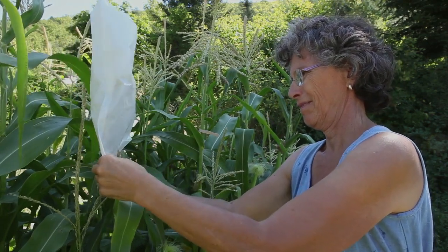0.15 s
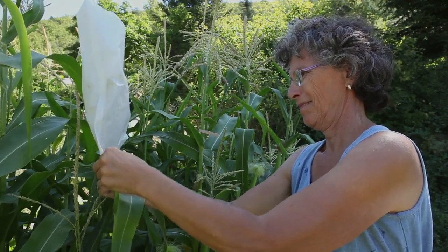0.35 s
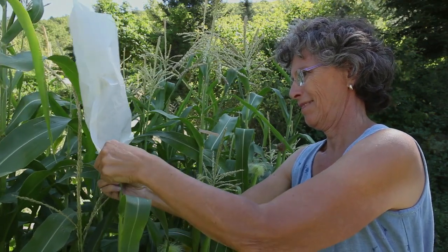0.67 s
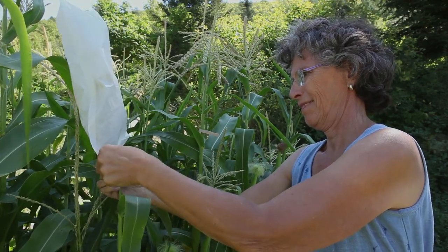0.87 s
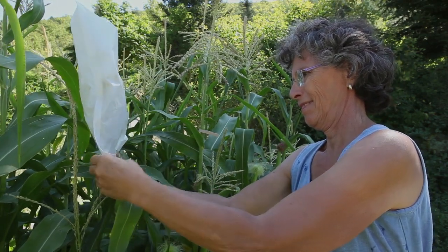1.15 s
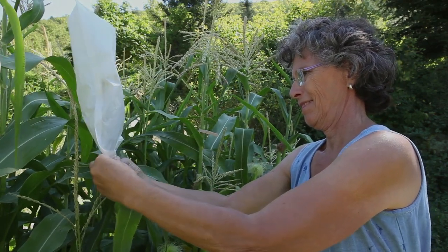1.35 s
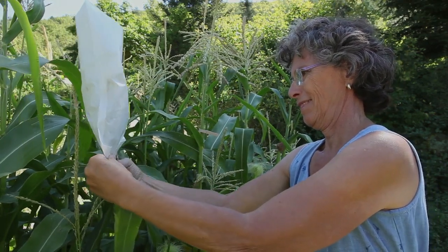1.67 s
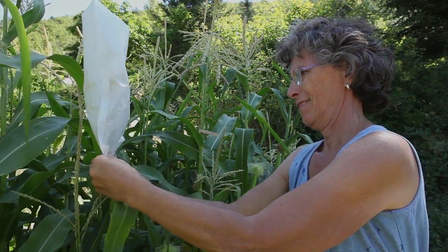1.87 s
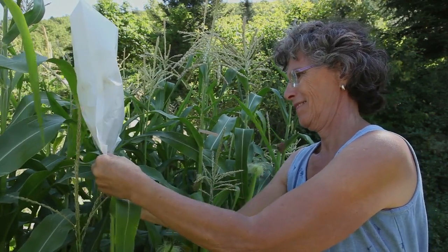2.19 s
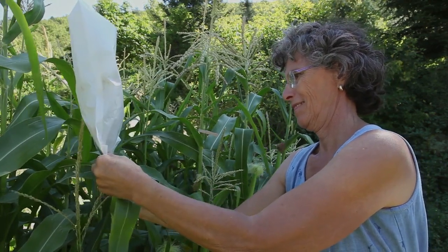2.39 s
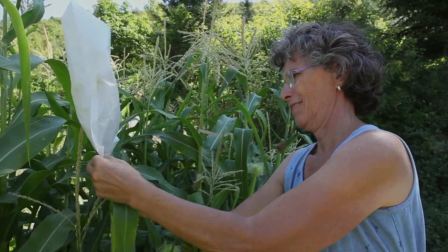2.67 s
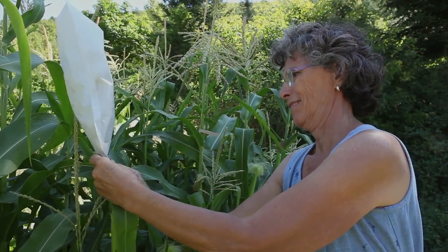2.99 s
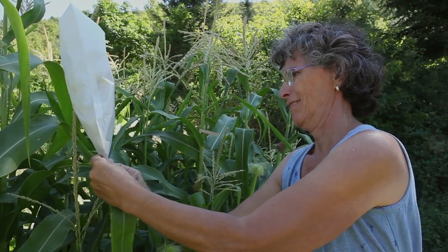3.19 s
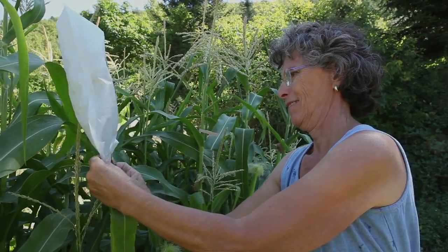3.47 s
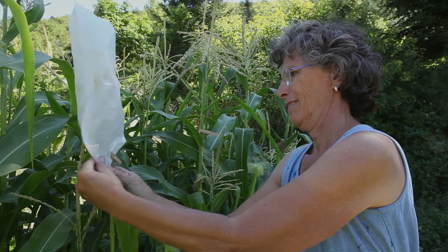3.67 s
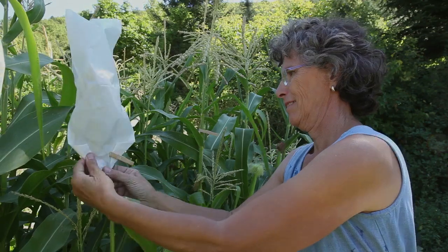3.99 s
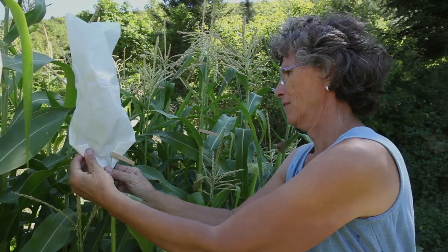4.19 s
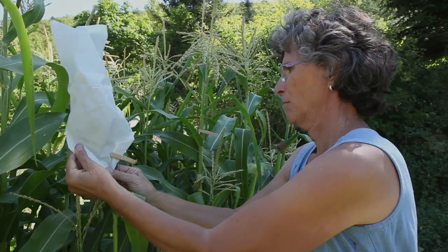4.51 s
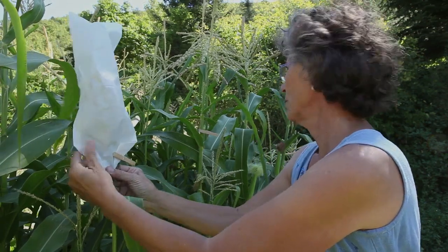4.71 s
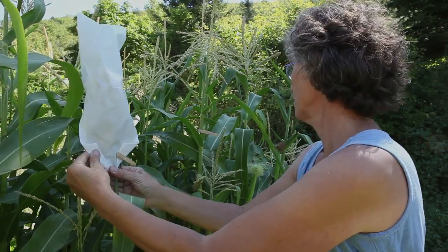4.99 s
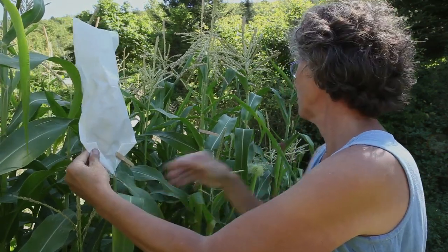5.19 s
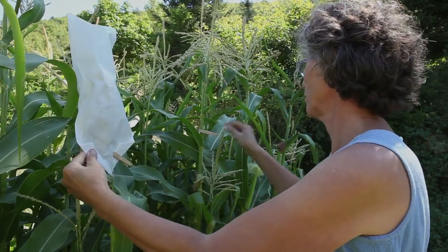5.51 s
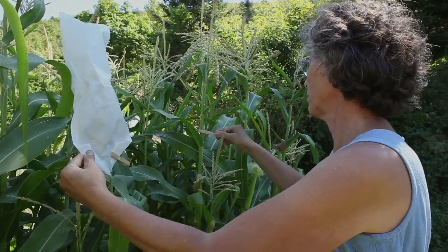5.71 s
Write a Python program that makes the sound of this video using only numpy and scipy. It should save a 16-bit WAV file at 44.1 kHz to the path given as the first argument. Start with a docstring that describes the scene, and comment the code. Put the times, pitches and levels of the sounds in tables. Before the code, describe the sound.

Close, dry paper crinkling with sharp snaps and soft rubbing outdoors, pausing briefly twice, then fading to faint air.

```python
"""A stiff paper bag, gathered around a corn stalk and pinned shut close to the microphone in a quiet garden.
Its creases snap: bursts of jerks drive the sheet in three bands, singly, in squeezes and as strays.
Hands and leaves rub the paper (noise and fine crackle), and a leaf squeaks once as a falling sine.
The hollow bag colours snaps and rubbing. Plants scatter all paper sound and the far garden edge echoes it.
Behind lie faint air noise and a far low drone."""
import sys
import numpy as np
from scipy import signal
from scipy.fft import rfft, irfft, next_fast_len
from scipy.io import wavfile
from scipy.ndimage import map_coordinates

SR = 44100
rng = np.random.default_rng(int(sys.argv[2]) if len(sys.argv) > 2 else 0)


def log_audio(samples):
    """Write samples as a 16-bit WAV file to the path given in sys.argv[1]."""
    # one column per channel
    frames = np.atleast_2d(samples).T
    # limit to full scale, then quantise
    limited = np.clip(frames, -1, 1)
    pcm = np.round(limited * 32767).astype(np.int16)
    wavfile.write(sys.argv[1], SR, pcm)


N = 257984

# single creases that stand out: start_s, sheet_db (crack of the sheet, rms over 10 ms),
# hollow_db (low pop of the bag, re sheet), crisp_db (bright click, re sheet)
SINGLE_CREASES = [(.003, -28.5, -14, -8), (.016, -40, -5.5, 2.5), (.029, -34.5, -9.5, -4),
                  (.053, -34.5, 2, -6), (.133, -41.5, -10.5, 3), (.144, -34, -3, -9), (.153, -36, -2.5, -4),
                  (.222, -37, -11, 4.5), (.286, -44, -7.5, 6.5), (.313, -35.5, 2.5, -10),
                  (.373, -31, -9, 0.5), (.442, -31, -1.5, -15), (.461, -28.5, -3, -1.5),
                  (.482, -29.5, -3, -10), (.52, -32.5, -13, 5.5), (.556, -33, -8, -6), (.576, -35, -9, 2.5),
                  (.606, -23.5, -7, -2.5), (.638, -24, -10, -4), (.664, -35, -3.5, 1.5),
                  (.702, -35.5, -25, 1), (.745, -32.5, 2, 5.5), (.755, -31, -8.5, -14),
                  (.782, -34.5, -5, -4), (.8, -37, -10, 4), (.829, -34, -12, -1.5), (.911, -45, -17, 10),
                  (1.0, -52.5, -4, 14), (1.226, -43.5, -15.5, -1), (1.238, -37, -5, -19),
                  (1.25, -38, -19.5, -5), (1.294, -36, -30, 4), (1.321, -38.5, -13.5, -10),
                  (1.374, -36, -13, -4), (1.448, -35.5, -7, -28), (1.477, -42.5, -4.5, -9),
                  (1.553, -29, -8.5, 3), (1.611, -30.5, -2.5, 3.5), (1.629, -29, -9, -0.5),
                  (1.646, -29, -1, -1), (1.69, -32.5, -18, -11), (1.705, -31.5, -9, -2.5),
                  (1.734, -35, -3, -3), (1.749, -37.5, -5, 8.5), (1.77, -30.5, 3, -2),
                  (1.78, -26, -4.5, -9), (1.808, -39, 10, -6), (1.836, -40, 6, 1),
                  (1.873, -36.5, -21.5, -4), (1.913, -38.5, -1.5, -11), (1.933, -29.5, 5, -1.5),
                  (1.963, -37.5, -12, -5), (1.975, -30, 3.5, -2), (1.993, -27, -1, -7),
                  (2.338, -44.5, 2.5, -16), (2.477, -45, -17.5, 8), (2.565, -45, -17.5, 8),
                  (2.592, -27.5, -8.5, 1.5), (2.65, -27.5, -7, -3), (2.687, -54, -8, 17.5),
                  (2.723, -40, -15, 4.5), (2.785, -38, -2, -1), (2.856, -36.5, 2.5, -13),
                  (2.892, -26.5, -11, 0), (2.957, -31, -29.5, 0), (3.016, -32, -7, 1), (3.043, -45, -5, 9),
                  (3.076, -39.5, -23, 6), (3.091, -28.5, -27, -5), (3.174, -29, -13.5, 4.5),
                  (3.186, -36, -9, 6), (3.213, -41.5, -23, 4), (3.229, -55, 12.5, -9),
                  (3.261, -44.5, -19.5, 3.5), (3.279, -40.5, -24.5, -1), (3.296, -47, -11, -1),
                  (3.313, -47.5, -23.5, 7), (3.354, -47, -2.5, -0.5), (3.427, -38, -1, -9),
                  (3.444, -39.5, 8, 0), (3.586, -36, -26.5, 2), (3.613, -36.5, -15.5, -2),
                  (3.641, -37.5, -9.5, 4.5), (3.736, -36, -19, 5), (3.775, -27, -13, -2),
                  (3.822, -34.5, -4, -12), (3.865, -38, -6, -4), (3.893, -35, -3, -1.5),
                  (3.95, -40, -18, -0.5), (3.975, -35, -30, 4), (3.996, -40.5, -15.5, 5),
                  (4.02, -27, -4.5, -4), (4.053, -31, -0.5, -3.5), (4.088, -25.5, -5, -8),
                  (4.147, -25.5, -9.5, -7), (4.155, -35, -3, 1.5), (4.187, -28, -8, -7),
                  (4.224, -25.5, -11, -2), (4.237, -24.5, -11.5, -3.5), (4.263, -25.5, -13, -1.5),
                  (4.281, -27, -9, -6), (4.389, -41, 0, 2), (4.409, -35, -10.5, -1.5),
                  (4.433, -33.5, 0, -5.5), (4.495, -53, -13, 12), (4.518, -30, -1.5, 1),
                  (4.534, -25.5, -4, -6.5), (4.613, -37, -25, 3), (4.623, -33, -13, -7),
                  (4.679, -34, -6.5, -4.5), (4.721, -48, -22.5, 14), (4.786, -25.5, -17.5, -4.5),
                  (4.803, -32.5, -30, 0), (4.823, -36.5, -18.5, 3), (4.846, -37.5, -4, -6),
                  (4.863, -33, -8, -1), (4.911, -34, -25.5, 0), (4.924, -36, -14.5, 3),
                  (4.931, -32.5, -2.5, -10), (4.957, -39, -1.5, -7), (5.032, -28, -6.5, 1),
                  (5.09, -33.5, -12.5, -4.5), (5.18, -55, -15, 8.5), (5.3, -41.5, -17, -23),
                  (5.394, -50, -14.5, -2), (5.423, -56, -18.5, 8), (5.512, -62, 12, -5)]
# squeezes that crush many creases in a row: start_s, length_s, sheet_db
CRUSHING_SQUEEZES = [(.618, .025, -31), (1.572, .035, -34.5), (1.774, .025, -32), (4.059, .06, -35.5),
                     (4.206, .09, -32), (4.534, .028, -34)]
# spectrum of a buckling crease: frequency_hz, level_db (per Hz, relative)
CREASE_SPECTRUM = [(71, -49), (120, -8), (170, -23.5), (246, -13), (385, -10), (436, -4), (557, -6.5),
                   (856, 1), (1190, -5), (2700, 0), (4590, -4), (8480, -13), (10200, -18.5), (13900, -26.5),
                   (16000, -32)]
# resonances of the air in the bag: centre_hz, width_hz, lift_db
BAG_RESONANCES = [(467, 74, -1), (760, 71, 0.5), (897, 32, 1.5)]
# hands and leaves sliding over the paper: middle_s, length_s, level_db
RUBBING_STROKES = [(.01, 0.091, -34.5), (0.156, 0.11, -42.5), (0.345, 0.31, -46.5), (0.45, 0.086, -51),
                   (.61, 0.19, -39.5), (0.783, 0.11, -42.5), (.96, 0.095, -44), (1.344, 0.16, -46),
                   (1.607, 0.084, -36), (1.77, 0.1, -45.5), (1.96, 0.14, -46), (2.155, 0.036, -46.5),
                   (2.225, 0.062, -49.5), (2.432, 0.036, -43.5), (2.62, .22, -46), (2.836, 0.19, -42.5),
                   (3.154, 0.098, -44), (3.446, 0.059, -43.5), (3.593, .13, -42.5), (3.834, 0.21, -40.5),
                   (4.066, 0.11, -40.5), (4.235, 0.075, -35), (4.435, 0.045, -50.5), (4.556, 0.15, -44.5),
                   (4.88, 0.61, -52.5), (5.064, 0.13, -49), (5.702, .17, -52)]
# spectrum of sliding paper: frequency_hz, level_db (per Hz, relative)
SLIDING_SPECTRUM = [(120, -8), (220, -14), (400, -5.5), (600, -4.5), (870, -2.5), (1200, -6), (2200, -1.5),
                    (4500, -5), (8800, -14), (11000, -20), (16000, -35)]
# a leaf slipping on the paper: time_s, pitch_hz, level_db
LEAF_SQUEAK = [(.853, 4800, -68), (.862, 4470, -55), (.872, 4280, -46), (.881, 4150, -53),
               (.885, 4100, -71)]
# decay of the scatter from the plants: frequency_hz, t60_s
PLANT_DECAY = [(200, 0.32), (2000, 0.051), (12000, 0.055)]
# spectrum of still garden air: frequency_hz, level_db (per Hz, relative)
AIR_SPECTRUM = [(15, -27), (40, -10.5), (145, -13.5), (300, -10), (600, -12.5), (2800, -18.5), (6200, -22),
                (8500, -20.5), (16000, -20)]
# far low drone: time_s, level_db (before its wavering)
DRONE_LEVEL = [(0, -69), (.9, -71.5), (1.15, -64), (1.48, -62), (1.6, -69.5), (5.1, -82.5), (5.4, -70.5),
               (5.85, -70)]

HOLLOW_HZ, CRISP_HZ = 1300, 4500  # edges between the hollow, sheet and crisp bands
# running time of a crease of typical strength and hollowness 0; that strength; longest run
RUN_S, TYPICAL_DB, LONGEST_RUN_S = .0058, -34, .0058
RUN_HOLLOW_DB, RUN_STRENGTH_DB = 10, 25.5  # rise in hollowness or in strength that doubles the run
CRUSH_GAP_S, CRUSH_SCATTER_DB = 0.0083, 1.5  # mean gap between crushed creases; spread of strength
CRUSH_HOLLOW_DB, CRUSH_CRISP_DB = -8, -4.5
STRAY_DB, STRAY_SCATTER_DB = -1.5, 1.53  # strength of stray creases, relative to the rubbing level
STRAY_HOLLOW_DB, STRAY_CRISP_DB = -9, -3.5
COLOUR_SCATTER_DB = 3  # spread of hollowness and crispness among crushed or stray creases
# faint rubbing of the held bag, until the hand leaves it
HOLD_DB, LET_GO_S, RELEASE_DB_PER_S = -56.5, 5.24, 33.5
BODY_DB, SURFACE_DB = -5.5, -1.5  # share of the rubbing in the bag's body and in its surface hiss
TOP_HZ = 15950  # upper band limit at the microphone


def snaps(creases, size=4096):
    """Every jerk clicks and shakes the sheet; hollow, strong creases run longer, up to a limit."""
    start_s, sheet_db, hollow_db, crisp_db = creases.T
    doublings = hollow_db / RUN_HOLLOW_DB + (sheet_db - TYPICAL_DB) / RUN_STRENGTH_DB
    run_s = np.minimum(RUN_S * 2 ** doublings, LONGEST_RUN_S)
    t, hz = np.arange(size) / SR, np.fft.rfftfreq(size, 1 / SR)
    lead_s = .003  # room for the warning tick
    jerks = slips(run_s, lead_s, first=2.33, warning=0.13, scatter_db=4, count=9)
    # a short crease barely stirs the sheet
    stirred = np.sqrt(np.minimum(np.abs(run_s) / 0.001, 1))[:, None]
    colour = amp(along(CREASE_SPECTRUM, hz)) * bag(hz)
    colour = colour * facets(hz, creases, depth_db=2.5) * above(hz, 243, order=3)
    # some creases break more sharply: the top treble varies from one to the next
    sharpness_db = 2.3 * rng.standard_normal((len(start_s), 1))
    colour = colour * amp(sharpness_db * above(hz, 13700))

    def band(gain, level_db, t60, ring_db):
        """The jerks plus the noisy shaking they leave, in one band at its own level."""
        decay_power = amp(-60 * t / t60) ** 2
        kernel = decay_power[None] / decay_power.sum()
        shaking_power = signal.fftconvolve(jerks ** 2, kernel, axes=1)[:, :size]
        shaking = np.sqrt(np.abs(shaking_power))
        drive = jerks + amp(ring_db) * stirred * shaking * rng.standard_normal(jerks.shape)
        wave = unit(irfft(rfft(drive) * causal(colour * gain)))
        # levels are rms over 10 ms
        return wave * amp(level_db)[:, None] * np.sqrt(.01 * SR / size)

    hollow_gain = below(hz, HOLLOW_HZ)
    sheet_gain = above(hz, HOLLOW_HZ) * below(hz, CRISP_HZ)
    crisp_gain = above(hz, CRISP_HZ)
    waves = band(hollow_gain, sheet_db + hollow_db, t60=0.032, ring_db=0.5)
    waves += band(sheet_gain, sheet_db, t60=0.028, ring_db=-5)
    waves += band(crisp_gain, sheet_db + crisp_db, t60=0.034, ring_db=-8)
    first_sample = np.maximum(np.round((start_s - lead_s) * SR).astype(int), 0)
    where = first_sample[:, None] + np.arange(size)
    return np.bincount(where.ravel(), waves.ravel(), N)[:N]


def slips(run_s, lead_s, first, warning, scatter_db, count=7, size=4096):
    """A crease ticks faintly under strain, gives way at once, then runs on in a few uneven jerks."""
    when = rng.uniform(0, 1, (len(run_s), count)) * run_s[:, None]
    push = amp(scatter_db * rng.standard_normal(when.shape)) * rng.choice([-1, 1], when.shape)
    when[:, 0], push[:, 0] = 0, first
    when[:, 1] = -lead_s * rng.random(len(run_s))
    push[:, 1] *= warning
    train = np.zeros((len(run_s), size))
    sample = np.clip((when + lead_s) * SR, 0, size - 1).astype(int)
    np.add.at(train, (np.arange(len(run_s))[:, None], sample), push)
    return train


def facets(hz, creases, depth_db, count=48):
    """Each crease frees a facet of its own shape, with its own random peaks and dips."""
    knots = rng.standard_normal((len(creases), count))
    place = np.sqrt(hz / hz[-1]) * (count - 1)
    shapes = [map_coordinates(row, [place], mode="nearest") for row in knots]
    return amp(depth_db * np.array(shapes))


def bag(hz):
    """The hollow of the bag lifts a few broad resonances."""
    return amp(sum(db / (1 + (2 * (hz - centre) / width) ** 2) for centre, width, db in BAG_RESONANCES))


def crushed(count=12):
    """A squeeze breaks crease after crease at an uneven pace; columns as in SINGLE_CREASES."""
    rows = []
    for start_s, length_s, sheet_db in CRUSHING_SQUEEZES:
        delay_s = (np.arange(count) + rng.random(count)) * CRUSH_GAP_S
        spread_db = [CRUSH_SCATTER_DB, COLOUR_SCATTER_DB, COLOUR_SCATTER_DB]
        chance_db = rng.standard_normal((count, 3)) * spread_db
        levels_db = chance_db + [sheet_db, CRUSH_HOLLOW_DB, CRUSH_CRISP_DB]
        rows.append(np.column_stack([start_s + delay_s, levels_db])[delay_s < length_s])
    return np.vstack(rows)


def strays(slide_db, count=170):
    """Small creases give way at random, stronger where the rubbing is; columns as in SINGLE_CREASES."""
    at = ((np.arange(count) + rng.random(count)) * (N - 1) / count).astype(int)
    strength, hollow, crisp = rng.standard_normal((count, 3)).T
    sheet_db = slide_db[at] + STRAY_DB + STRAY_SCATTER_DB * strength
    hollow_db = STRAY_HOLLOW_DB + COLOUR_SCATTER_DB * hollow
    crisp_db = STRAY_CRISP_DB + COLOUR_SCATTER_DB * crisp
    return np.column_stack([at / SR, sheet_db, hollow_db, crisp_db])


def rubbing(slide_db):
    """Sliding paper hisses softly; the harder it is worked, the more of its sound is fine crackle."""
    grip_db = 2.2 * wobble(70)  # the fingers catch and slide
    worked = np.clip(0.69 + 0.011 * (slide_db + 44.5), .3, .9)  # share of crackle in the power

    def friction(rate, spread_db, t60):
        """Crackle and steady hiss, mixed by how hard the paper is worked."""
        hiss = rng.standard_normal(N)
        return np.sqrt(worked) * crackle(rate, spread_db, t60) + np.sqrt(1 - worked) * hiss

    def paper(hz):
        """Gain of the sliding paper."""
        return amp(along(SLIDING_SPECTRUM, hz))

    body = filtered(friction(rate=150, spread_db=3.0, t60=0.04),
                    lambda hz: paper(hz) * bag(hz) * below(hz, HOLLOW_HZ) * above(hz, 232, order=3))
    # broad wrinkles tick dully, narrow ones brightly and more briefly
    broad = filtered(friction(rate=230, spread_db=3, t60=0.013), lambda hz: below(hz, CRISP_HZ, order=2))
    narrow = filtered(friction(rate=230, spread_db=1.0, t60=0.011), lambda hz: above(hz, CRISP_HZ, order=2))
    surface = filtered(broad + narrow, lambda hz: paper(hz) * above(hz, HOLLOW_HZ))
    mix = amp(BODY_DB) * unit(body) + amp(SURFACE_DB) * unit(surface)
    return amp(slide_db + grip_db) * mix


def crackle(rate, spread_db, t60, size=1024):
    """Tiny wrinkles pop at random, rate a second, many weak and a few strong, as decaying noise."""
    sizes = amp(spread_db * np.minimum(rng.exponential(size=N), 3.5))
    pops = (rng.random(N) < rate / SR) * sizes
    decay = amp(-60 * np.arange(size) / SR / t60)
    power = signal.fftconvolve(pops ** 2, decay ** 2)[:N]
    return unit(np.sqrt(np.abs(power)) * rng.standard_normal(N))


def sliding_db():
    """Each stroke swells and fades as a bell, above the faint rubbing of the held bag."""
    t = np.arange(N) / SR
    held = amp(HOLD_DB - RELEASE_DB_PER_S * np.maximum(t - LET_GO_S, 0))
    stroke_power = 0
    for middle_s, length_s, level_db in RUBBING_STROKES:
        bell = np.exp(-(2 * (t - middle_s) / length_s) ** 2 / 2)
        stroke_power = stroke_power + (amp(level_db) * bell) ** 2
    return 10 * np.log10(held ** 2 + stroke_power)


def squeak():
    """A leaf sticks and slips on the paper in a thin falling note, a gliding sine."""
    pitch_hz, level_db = curves(LEAF_SQUEAK)
    t = np.arange(N) / SR
    sounding = (t > LEAF_SQUEAK[0][0]) & (t < LEAF_SQUEAK[-1][0])
    tone = np.sqrt(2) * np.sin(2 * np.pi * np.cumsum(pitch_hz) / SR)
    return sounding * amp(level_db) * tone


def garden_answer(x, scatter_db, echo_db, echo_s, echo_t60):
    """Plants scatter the sound; the far edge of the garden sends back a smeared echo."""
    hz, t, z = signal.stft(rng.standard_normal(SR // 2), SR, nperseg=256)
    decay = amp(-60 * t / along(PLANT_DECAY, hz)[:, None])
    scatter = signal.istft(z * decay, SR, nperseg=256)[1]
    late_s = np.arange(len(scatter)) / SR - echo_s
    echo = rng.standard_normal(len(late_s)) * (late_s > 0) * amp(-60 * np.abs(late_s) / echo_t60)
    tail = (amp(scatter_db) * unit(scatter) + amp(echo_db) * unit(echo)) / np.sqrt(len(late_s))
    return filtered(signal.fftconvolve(x, tail)[:N], lambda hz: below(hz, 7200, order=1))


def outdoors():
    """Faint, nearly even air noise and a far, wavering low drone, both filtered noise."""
    air = unit(filtered(rng.standard_normal(N), lambda hz: amp(along(AIR_SPECTRUM, hz))))
    drone = unit(filtered(rng.standard_normal(N), lambda hz: above(hz, 81, order=3) * below(hz, 158, order=4)))
    air_db = -59.5 + 0.38 * wobble(1.27)
    drone_db = curves(DRONE_LEVEL)[0] + 2.1 * wobble(7.9)
    return amp(air_db) * air + amp(drone_db) * drone


def amp(db):
    """Decibels to gain."""
    return 10 ** (np.asarray(db) / 20)


def unit(x):
    """Each row at rms 1."""
    return x / np.sqrt(np.mean(x ** 2, axis=-1, keepdims=True) + 1e-20)


def along(points, hz):
    """(Hz, value) points read on a log frequency axis."""
    f, v = np.transpose(points)
    return np.interp(np.log(hz + 1), np.log(f + 1), v)


def curves(rows):
    """One value per sample for each column after the time."""
    s, *cols = np.transpose(rows)
    return [np.interp(np.arange(N) / SR, s, c) for c in cols]


def wobble(rate):
    """A smooth random curve, rate knots a second."""
    knots = rng.standard_normal(int(N * rate / SR) + 4)
    return map_coordinates(knots, [np.arange(N) * rate / SR])


def filtered(x, response):
    """x shaped by a response of frequency."""
    size = next_fast_len(N + SR // 2)
    return irfft(rfft(x, size) * response(np.fft.rfftfreq(size, 1 / SR)), size)[..., :N]


def causal(gain):
    """The minimum-phase response with this gain, which rings only after it is struck."""
    cepstrum = irfft(np.log(np.maximum(gain, 1e-5)))
    half = cepstrum.shape[-1] // 2
    cepstrum[..., 1:half] *= 2
    cepstrum[..., half + 1:] = 0
    return np.exp(rfft(cepstrum))


def below(hz, edge_hz, order=4):
    """Gain of a low-pass."""
    return 1 / np.sqrt(1 + (hz / edge_hz) ** (2 * order))


def above(hz, edge_hz, order=4):
    """Gain of the high-pass that completes it in power."""
    return np.sqrt(1 - below(hz, edge_hz, order=order) ** 2)


def scene():
    """The bag is straight ahead of the microphone, alike in both channels."""
    slide_db = sliding_db()
    garden = outdoors()
    creases = np.vstack([SINGLE_CREASES, strays(slide_db), crushed()])
    paper = rubbing(slide_db) + squeak() + snaps(creases)
    answer = garden_answer(paper, scatter_db=-16, echo_db=-31.5, echo_s=0.044, echo_t60=0.17)
    mono = paper + answer + garden
    return np.array([mono, mono])


def record(dry):
    """The microphone side cuts off very steeply above its band limit."""
    return filtered(dry, lambda hz: below(hz, TOP_HZ, order=90))


dry = scene()
out = record(dry)
log_audio(out)
```